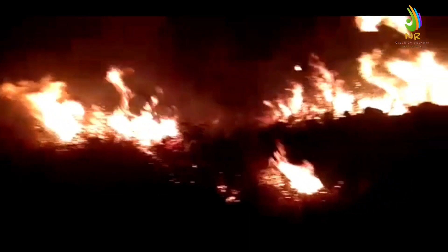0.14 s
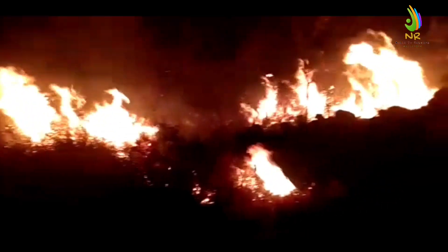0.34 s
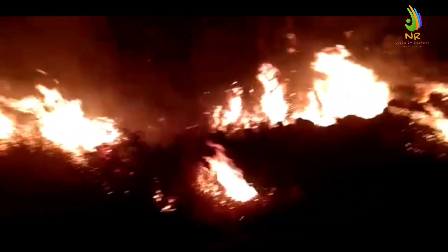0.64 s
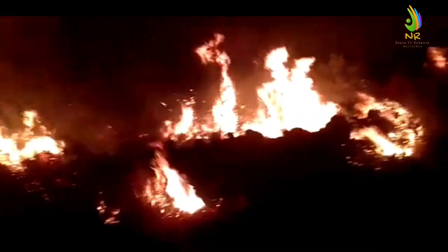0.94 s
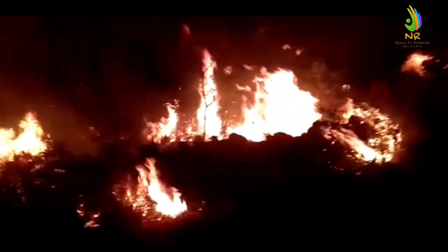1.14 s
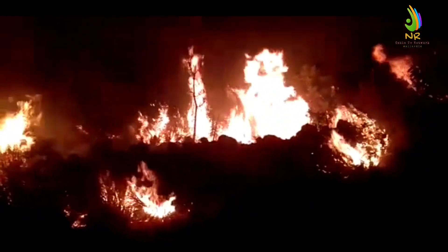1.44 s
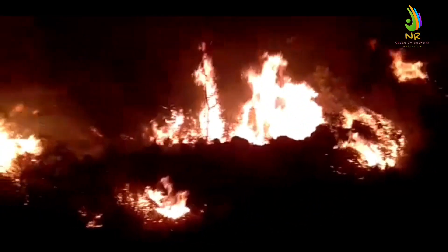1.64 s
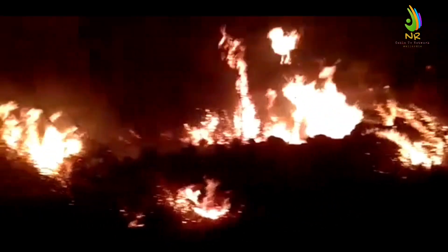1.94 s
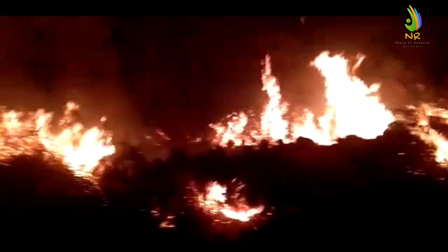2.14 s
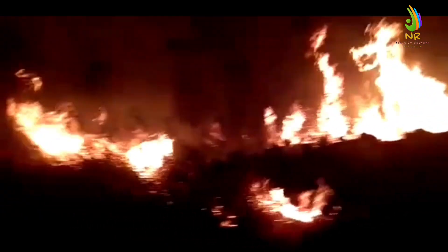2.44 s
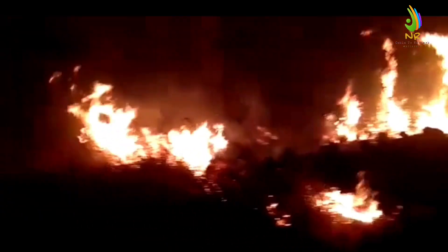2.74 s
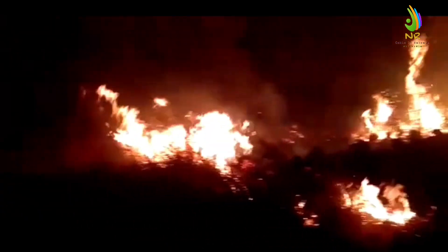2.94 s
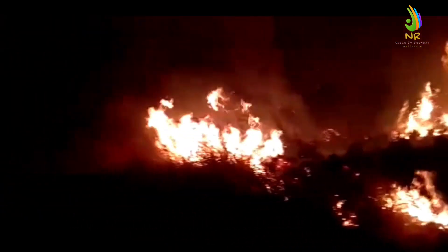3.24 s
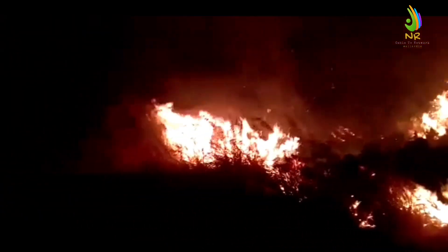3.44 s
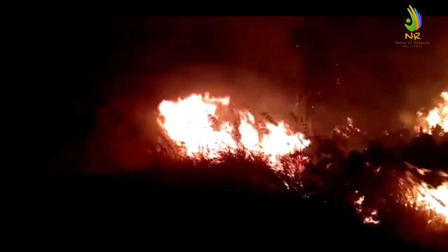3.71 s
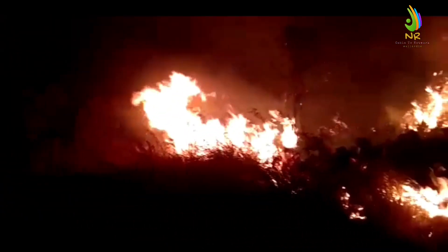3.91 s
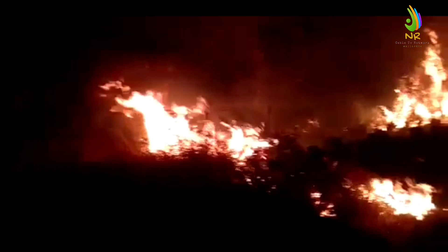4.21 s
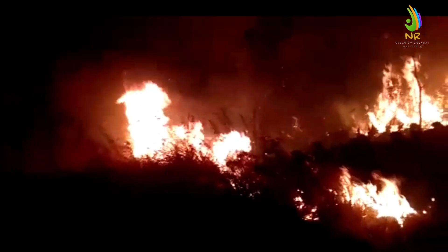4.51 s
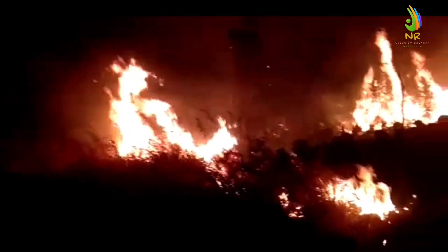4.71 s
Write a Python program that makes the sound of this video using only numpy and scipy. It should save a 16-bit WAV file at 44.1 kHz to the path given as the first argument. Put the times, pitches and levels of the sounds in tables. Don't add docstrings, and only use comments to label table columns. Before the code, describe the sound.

Outdoors at night, a wide brush fire burns with a continuous bright hiss, fine sizzle and irregular twig pops and leaf snaps. Wind gusts hit a small unprotected microphone, pattering up to blunt low thuds that overload and momentarily duck the fire. A low roar swells underneath, and a faint low machine hum comes and goes in short spells.

```python
import sys
import numpy as np
from scipy import signal
from scipy.fft import rfft, irfft, next_fast_len
from scipy.io import wavfile
from scipy.ndimage import uniform_filter1d, minimum_filter1d, map_coordinates

SR = 44100
rng = np.random.default_rng(int(sys.argv[2]) if len(sys.argv) > 2 else 0)


def linear_from_db(decibels):
    return 10 ** (np.asarray(decibels, float) / 20)


def output_pcm(signal):
    pcm = np.clip(np.atleast_2d(signal).T, -1, 1) * 32767
    wavfile.write(sys.argv[1], SR, np.round(pcm).astype(np.int16))


N = 214546


def unit(x):
    return x / np.sqrt(np.mean(x ** 2) + 1e-20)


def curves(rows):
    s, *cols = np.transpose(rows)
    return [np.interp(np.arange(N) / SR, s, c, left=c[0], right=c[-1]) for c in cols]


def wobble(rate):
    knots = rng.standard_normal(1200)
    return map_coordinates(knots, [np.arange(N) * rate / SR])


def coloured(x, spectrum):
    m = 2 * next_fast_len(N // 2 + 8192)
    hz, db = np.transpose(spectrum)
    log_hz = np.log(np.fft.rfftfreq(m, 1 / SR) + 1)
    gain = unit(linear_from_db(np.interp(log_hz, np.log(hz + 1), db)))
    cepstrum = irfft(np.log(gain + 1e-4), m)
    cepstrum[1:m // 2] *= 2
    cepstrum[m // 2 + 1:] = 0
    return irfft(rfft(x, m) * np.exp(rfft(cepstrum)), m)[:N]


def ticks(rate, spread_db, cap_db):
    size = linear_from_db(np.minimum(spread_db * rng.exponential(size=N), cap_db))
    return unit(size * (rng.random(N) < rate / SR))


def add(track, s, grain):
    track[round(s * SR):][:len(grain)] += grain


# start_s, end_s, level_db (rms)
HUM_SPELLS = [(0.32, 0.664, -41.5), (1.32, 1.673, -40.5), (1.962, 2.23, -42), (2.426, 2.74, -45),
              (3.013, 3.324, -42), (3.568, 3.82, -41)]


def hum():
    t = np.arange(N) / SR
    gate = np.zeros(N)
    for start, end, db in HUM_SPELLS:
        fade = np.clip(np.minimum(t - start, end - t) / 0.009, 0, 1)
        gate += linear_from_db(db + 3) * fade
    pitch_hz = 216 + 1.32 * wobble(9.5)
    phase = 2 * np.pi * np.cumsum(pitch_hz) / SR
    unsteady = linear_from_db(1.0 * wobble(41) + 1.7 * wobble(12))
    return gate * unsteady * (np.sin(phase) + linear_from_db(-13.0) * np.sin(2 * phase + 1))


# start_s, crest_s, hold_end_s, level_db
GUSTS = [(-.02, -.01, .004, -28), (0.034, 0.061, 0.11, -24), (.36, 0.482, 0.56, -23),
         (0.644, 0.667, 0.68, -18.5), (0.926, 0.984, 1.036, -21), (1.068, 1.095, 1.14, -25.5),
         (1.306, 1.423, 1.492, -21.5), (1.673, 1.68, 1.69, -19), (1.946, 2.115, 2.15, -22.5),
         (2.217, 2.243, 2.27, -23.5), (2.437, 2.607, 2.625, -19), (2.748, 2.76, 2.776, -19.5),
         (2.94, 3.07, 3.1, -34), (3.1, 3.17, 3.19, -24), (3.307, 3.324, 3.347, -22),
         (3.569, 3.664, 3.687, -21.5), (3.819, 3.833, 3.86, -18.5), (4.096, 4.172, 4.21, -26.5),
         (4.388, 4.405, 4.41, -44), (4.52, 4.53, 4.537, -14)]


def gusts():
    rise_db, surge_s, surge_db = 25.5, 0.062, 13.5
    release_s, release_db = 0.024, 40
    time, level = np.arange(N) / SR, np.zeros(N)
    fits = linear_from_db(7.5 * np.minimum(wobble(45), 0.5))
    for start, crest, end, db in GUSTS:
        knee = max(crest - surge_s, (start + crest) / 2)
        times = [start, knee, crest, end, end + release_s]
        levels_db = [db - rise_db, db - surge_db, db, db, db - release_db]
        shape_db = np.interp(time, times, levels_db, left=-120, right=-120)
        level += linear_from_db(shape_db) * np.where(time < knee, fits, 1)
    return level


# start_s, peak_db, pitch_hz
PUSHES = [(.007, -5.5, 113), (0.457, -17, 106), (0.493, -9.5, 160), (0.996, -7.5, 148), (1.01, -10.5, 189),
          (1.027, -5, 128), (1.394, -16, 189), (1.436, -6, 115), (1.455, -6, 201), (1.478, -0.5, 109),
          (1.488, -2, 98), (2.06, -17.5, 198), (2.643, 0.5, 108), (3.08, -23, 133), (3.135, -17, 99),
          (3.175, -14, 143)]
# start_s, peak_db, pitch_hz
PULLS = [(.063, -7.5, 127), (.075, -2.5, 97), (.094, -3, 86), (.519, -3, 98), (.534, 5.5, 94),
         (.561, -5, 140), (1.088, -7.5, 120), (1.101, -7.5, 114), (1.118, -7.5, 63), (1.417, -8, 82),
         (2.121, -2, 103), (2.156, -3.5, 133), (2.62, -10, 93.5), (3.192, -4, 123), (3.207, -5, 72),
         (3.67, -5.5, 126), (3.689, 2, 114), (3.705, -4.5, 68), (4.179, -1.5, 130), (4.204, 0.5, 116),
         (4.22, -6.5, 60.7), (4.238, -8.5, 67.1)]
# start_s, throw_db, pitch_hz, recoil_db
THUMPS = [(.662, -8, 104, -6.5), (1.684, -0.5, 104, -14), (2.241, -11.5, 100, -5), (2.758, -0.5, 110, 3.5),
          (3.327, -5.5, 101, -1.5), (3.835, -0.5, 105, -1.5), (4.531, -3, 90, -9)]
REBOUNDS = [0.023, .106, 0.581, 1.04, 1.142, 1.501, 2.173, 2.657, 3.222, 3.716, 4.252]
# start_s, peak_db
PATTER = [(.33, -30), (.368, -33), (.38, -17.5), (.398, -29), (.42, -20), (.443, -20), (.479, -22),
          (0.901, -28), (.975, -28), (1.311, -24), (1.345, -23), (1.378, -15), (1.975, -24), (2.021, -26),
          (2.077, -15), (2.485, -24), (2.516, -27), (2.561, -25), (2.595, -17.5), (2.96, -29),
          (2.994, -21.5), (3.04, -40), (3.06, -28), (3.123, -33), (3.151, -17), (3.606, -21.5),
          (3.637, -22), (4.134, -24), (4.406, -28), (4.79, -33)]


def swings():
    rows = [(s, db, hz, 1, 0.49) for s, db, hz in PUSHES]
    rows += [(s, db, hz, -1, 0.58) for s, db, hz in PULLS]
    for s, db, hz, recoil_db in THUMPS:
        rows.append((s, -2.5, 128, -1, 0.36))
        rows.append((s + 0.00458, db, hz, 1, 0.37))
        rows.append((s + 0.0105, recoil_db, 112, -1, 0.37))
        rows.append((s + 0.0208, -15.5, 65.6, 1, 0.51))
    rows += [(s, -19.5, 63.4, 1, 0.65) for s in REBOUNDS]
    for s, db in PATTER:
        hz = 100 * 2 ** (-1.35 * db / 40)
        rows.append((s, db, hz, 1, 0.35))
    return rows


# freq_hz, density_db (per Hz)
EDDY_SPECTRUM = [(30, -18.5), (90, -3.5), (200, 0.5), (300, -7), (500, -13.5), (750, -22.5), (1100, -30.5),
                 (1800, -41), (3000, -99)]


def buffeting():
    lead = 2048
    out, fronts = np.zeros(N + SR), np.zeros(N)
    t = np.arange(-lead, lead) / SR
    for s, db, hz, direction, cycles in swings():
        phase = hz * t * np.exp(-12 * t)
        life = phase / np.where(t > 0, 1.44 * cycles, cycles)
        envelope = np.exp(-life ** 2 - (t / 0.04) ** 2)
        add(out, s, direction * linear_from_db(db) * np.cos(2 * np.pi * phase) * envelope)
        fronts[round((s - 0.2 / hz) * SR)] = direction * linear_from_db(db - 1) * hz / 100
    for s, *_ in THUMPS:
        fronts[round((s - 0.001) * SR)] -= linear_from_db(4)
    pace = linear_from_db(4 * wobble(150)) * 280
    shed = np.diff(np.floor(np.cumsum(pace) / SR), prepend=0)
    eddies = unit(shed * linear_from_db(2.54 * rng.standard_normal(N)) * rng.choice([-0.6, 1], N))
    return out[lead:N + lead] + linear_from_db(2.5) * coloured(gusts() * eddies + fronts, EDDY_SPECTRUM)


# time_s, level_db
BLAZE = [(0.0, -29.5), (0.19, -30.5), (0.91, -30), (1.66, -31.5), (2.04, -31), (2.79, -34), (3.34, -33),
         (3.53, -32), (3.8, -33), (4.48, -30.5), (4.86, -31.5)]
# time_s, level_db
BREEZE = [(0, -39), (.15, -43.5), (.35, -39.5), (.8, -42.5), (1.25, -49), (1.56, -40.5), (1.77, -45),
          (1.97, -36.5), (2.3, -46), (2.5, -38.5), (2.85, -48), (2.99, -39), (3.4, -39.5), (3.55, -46.5),
          (4.05, -39), (4.3, -35), (4.68, -45), (4.86, -33)]
# freq_hz, density_db (per Hz)
HISS_SPECTRUM = [(700, -52.5), (1500, -16.5), (2100, -13), (2900, -7.5), (3400, -3), (4200, 1),
                 (5000, -2.5), (5650, -2.5), (6700, 1.5), (7600, -7.5), (8600, -15.5), (10500, -18.5),
                 (12000, -32), (15800, -26)]
SIZZLE_SPECTRUM = [(4000, -18), (8000, 1.5), (11000, -3), (15500, -6), (17000, -70)]
ROAR_SPECTRUM = [(15, -66), (45, -11.5), (76, 3.5), (180, -7), (380, -17), (800, -45.5)]
RUSH_SPECTRUM = [(150, -37), (400, -1.5), (800, -1.5), (1400, -1), (2200, -8.5), (4000, -35)]


def blaze():
    (hiss_db,), (breeze_db,) = curves(BLAZE), curves(BREEZE)
    rush_db = -48 + 1.27 * (hiss_db - hiss_db.mean())
    thick, thin, tiny = [rng.choice([-1, 1], N) * ticks(rate, spread_db=2.0, cap_db=13.0)
                         for rate in (800, 1000, 220)]
    low = linear_from_db(1.02 * wobble(40)) * (rng.standard_normal(N) + 0.7 * thick)
    high = linear_from_db(0.96 * wobble(40)) * (rng.standard_normal(N) + 0.67 * thin)
    split = signal.butter(2, 5300, fs=SR, output="sos")
    both = high + signal.sosfiltfilt(split, low - high)
    flicker = linear_from_db(0.16 * wobble(24) + 0.95 * wobble(70))
    hiss = unit(coloured(flicker * both, HISS_SPECTRUM))

    tiny = tiny * (1 + 0.56 * rng.standard_normal(N))
    tiny = tiny + 0.5 * np.roll(tiny, 23)
    sizzle = linear_from_db(-23.5 + 1.6 * wobble(22.8)) * coloured(tiny, SIZZLE_SPECTRUM)

    surging = linear_from_db(0.8 * wobble(12) + 2.8 * wobble(45)) * rng.standard_normal(N)
    roar = coloured(unit(surging), ROAR_SPECTRUM)
    roar_gain = linear_from_db(breeze_db) + linear_from_db(-6.5) * gusts()

    hot_air = linear_from_db(2.0 * wobble(25.1)) * (rng.standard_normal(N) + 0.5 * thick)
    rush = coloured(unit(hot_air), RUSH_SPECTRUM)
    return linear_from_db(hiss_db + 0.34) * (hiss + sizzle) + roar_gain * roar + linear_from_db(rush_db + 1.6) * rush


def strays(level_db, count):
    s, size = rng.random((count, 2)).T
    return list(zip(s * N / SR, level_db + 2.5 * (4 * size - 2)))


# start_s, peak_db
FIRST_POP = [(.0058, -12.5)]
# start_s, peak_db
THIN_TWIGS = [(0.1381, -20), (0.2234, -14), (0.2633, -18), (0.2693, -17), (0.391, -14), (0.404, -15),
              (0.5736, -12), (0.7138, -10), (1.8532, -15), (1.8751, -10), (2.0772, -21), (2.1435, -17),
              (2.2273, -14), (2.2912, -14), (2.5371, -11.5), (2.6778, -20), (2.7053, -15), (2.7337, -12),
              (2.9337, -39), (2.9337, -14), (2.9821, -18.5), (3.0929, -15), (3.139, -21), (3.4506, -21),
              (3.7913, -14), (4.14, -14), (4.4174, -9.5), (4.5411, -8), (4.7177, -17), (4.7376, -11)]
# start_s, peak_db
THICK_TWIGS = [(0.168, -18), (0.2693, -16.5), (0.5806, -26), (0.5806, -14.5), (0.949, -22), (1.041, -18),
               (1.7878, -15.5), (2.0083, -20), (2.0775, -20), (2.0961, -21.5), (2.2258, -18),
               (2.243, -15.5), (2.5371, -18), (2.599, -25), (2.616, -19), (2.706, -14.5), (2.9337, -20),
               (3.0929, -24), (3.257, -20), (4.2175, -19), (4.347, -19), (4.4173, -19), (4.7376, -24),
               (4.7378, -14.5)]
# start_s, peak_db
LEAF_SNAPS = [(0.2693, -26), (0.619, -24), (0.8929, -26), (0.9492, -25), (1.0345, -25), (1.1114, -31),
              (1.8751, -18), (2.0078, -17), (2.2283, -25), (2.2892, -30), (2.4309, -28), (2.5366, -39),
              (2.5366, -21), (2.6738, -24.5), (2.7053, -30), (2.7332, -21), (2.8454, -25), (2.9218, -32),
              (2.9337, -24), (2.9821, -24), (3.3782, -25), (3.454, -29), (3.4755, -23), (3.6277, -22),
              (4.3136, -26), (4.36, -27), (4.4258, -33), (4.4258, -16), (4.5411, -24), (4.7945, -20)]
# freq_hz, density_db (per Hz)
SNAP_SPECTRUM = [(1500, -27), (4000, -7), (7000, 4), (11000, -3), (15500, -12), (17000, -51)]


def pops():
    rings, cracks, snaps = np.zeros((3, N + SR))
    t = np.arange(700) / SR
    thin = FIRST_POP + THIN_TWIGS + strays(-25, count=40)
    thick = FIRST_POP + THICK_TWIGS + strays(-25, count=26)
    twigs = [(s, db + 4, 6470) for s, db in thin] + [(s, db + 6, 3700) for s, db in thick]
    for (s, db, hz), noise in zip(twigs, rng.standard_normal((len(twigs), len(t)))):
        hz = hz * (1 + 0.024 * noise[-1])
        ring = np.sin(2 * np.pi * hz * t) * linear_from_db(-60 * t / 0.0029) * (1 - np.exp(-t / 0.00014))
        add(rings, s, linear_from_db(db) * ring)
        burst, scatter = linear_from_db(-5 - 60 * t / 0.0011), linear_from_db(-9.0 - 60 * t / 0.018)
        add(cracks, s, linear_from_db(db) * noise * (burst + scatter))
    leaves = LEAF_SNAPS + strays(-35, count=60)
    for (s, db), noise in zip(leaves, rng.standard_normal((len(leaves), 40))):
        add(snaps, s, linear_from_db(db + 5.5) * unit(noise) * linear_from_db(-60 * t[:40] / 0.0018))
    crack = linear_from_db(-9) * coloured(cracks[:N], HISS_SPECTRUM)
    return linear_from_db(2.5) * rings[:N] + crack + coloured(snaps[:N], SNAP_SPECTRUM)


def scene():
    return (blaze() + pops() + buffeting() + hum())[None]


def band_limit(x):
    return signal.sosfilt(signal.butter(12, 16260, fs=SR, output="sos"), x)


def record(dry):
    x = signal.sosfilt(signal.butter(1, 30, "high", fs=SR, output="sos"), dry)
    need = np.minimum(1, 0.86 / (np.abs(x) + 1e-9))
    x = x * uniform_filter1d(minimum_filter1d(need, 500), 400)
    x = x / (1 + np.abs(x / 0.73) ** 8) ** (1 / 8)
    x = irfft(rfft(x) * (np.fft.rfftfreq(N, 1 / SR) < 15820), N)
    return band_limit(x)


dry = scene()
out = record(dry)
output_pcm(out)
```